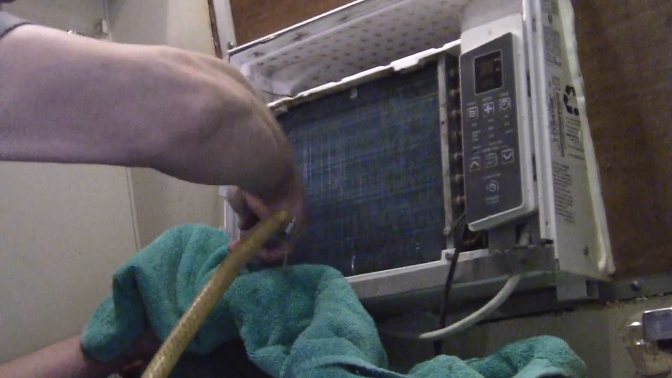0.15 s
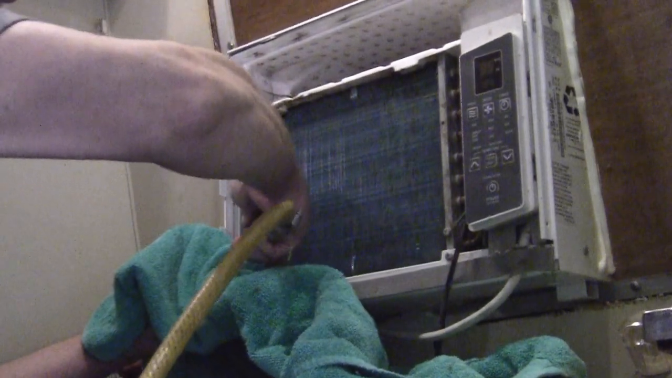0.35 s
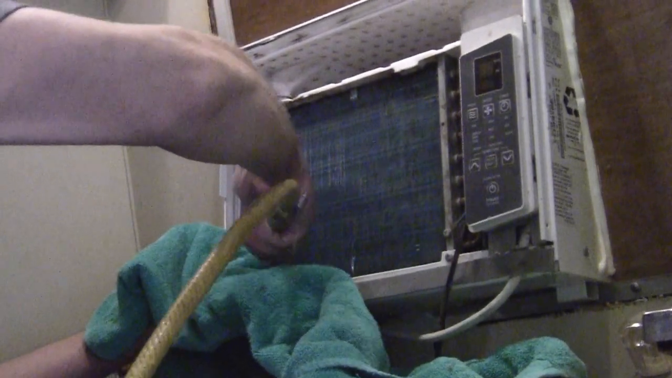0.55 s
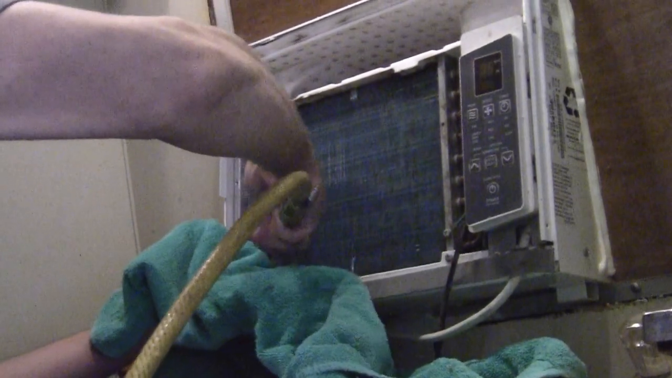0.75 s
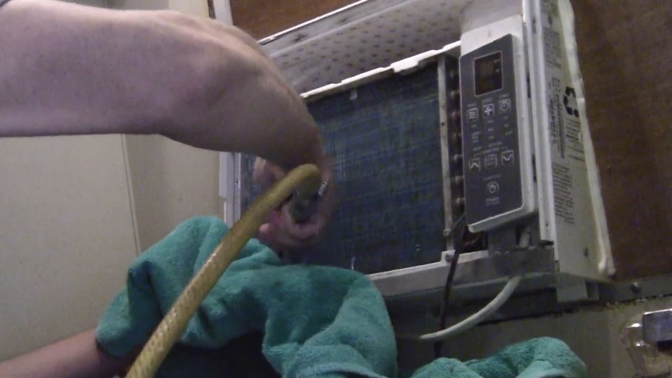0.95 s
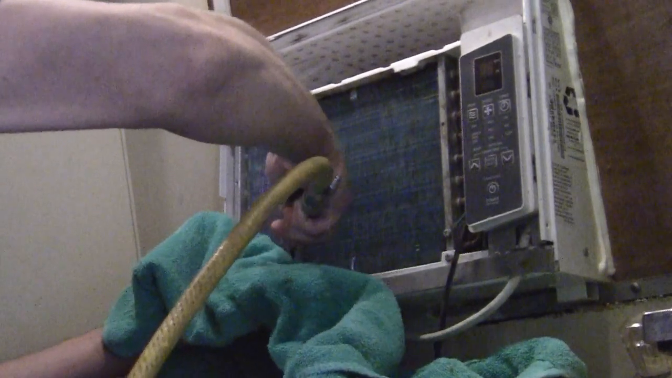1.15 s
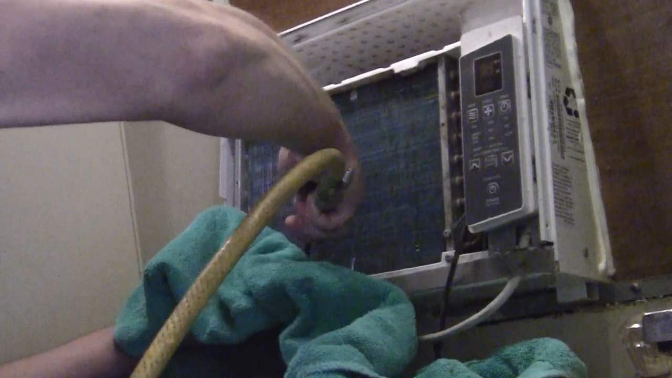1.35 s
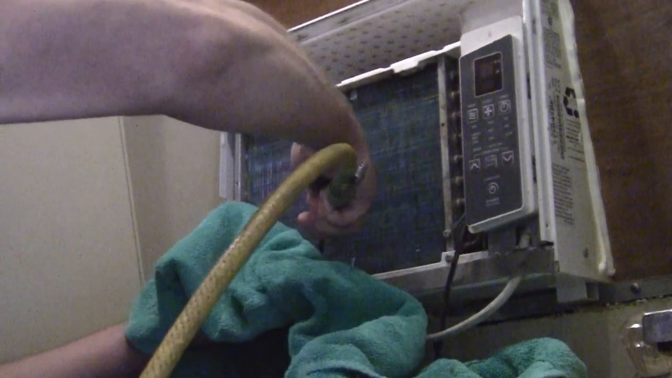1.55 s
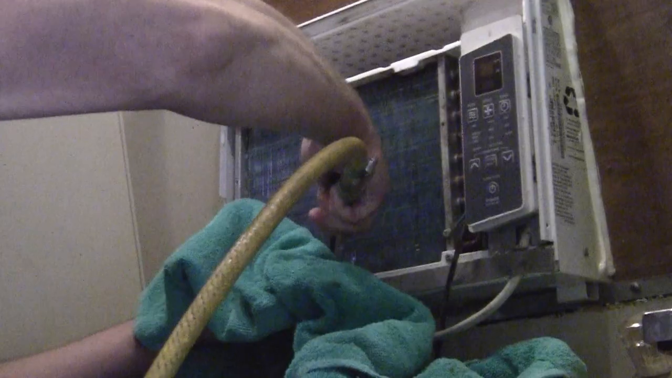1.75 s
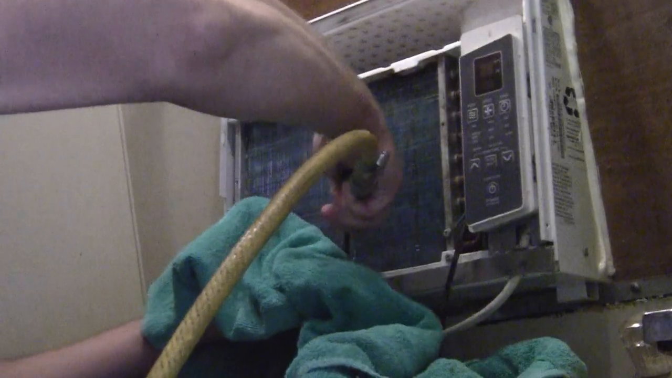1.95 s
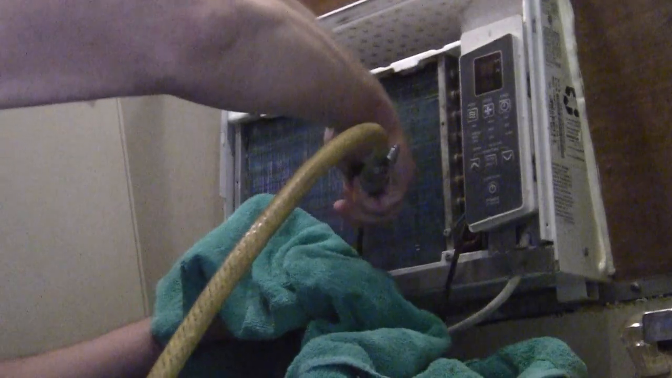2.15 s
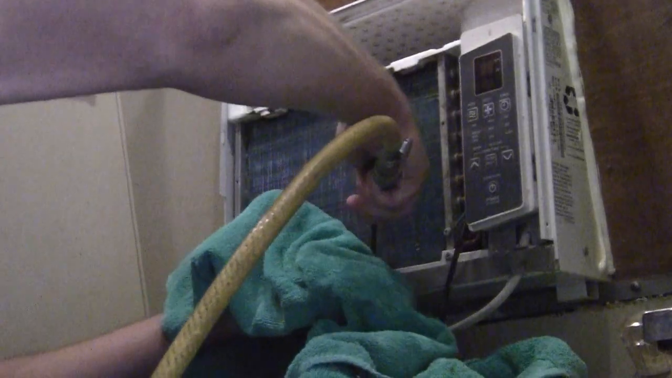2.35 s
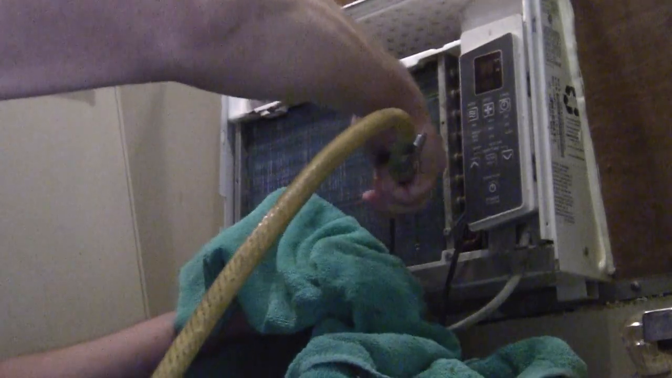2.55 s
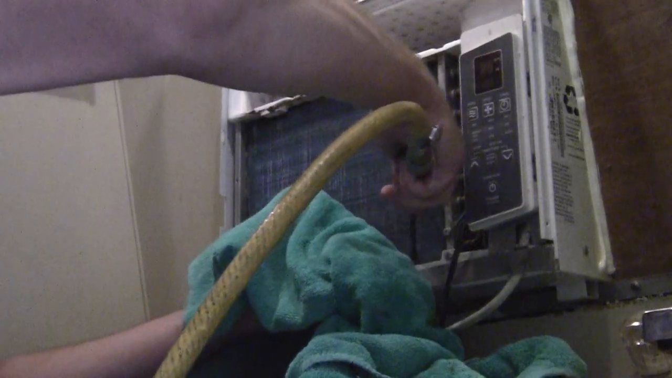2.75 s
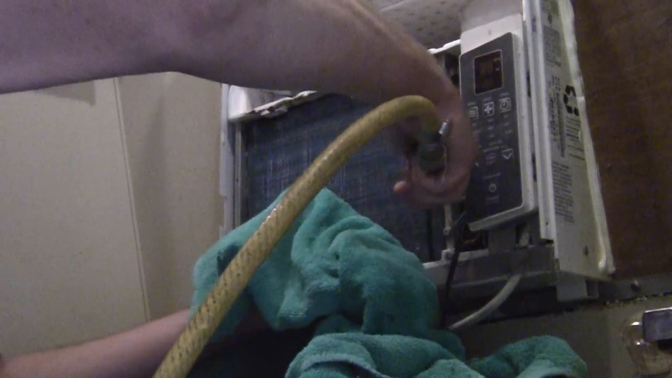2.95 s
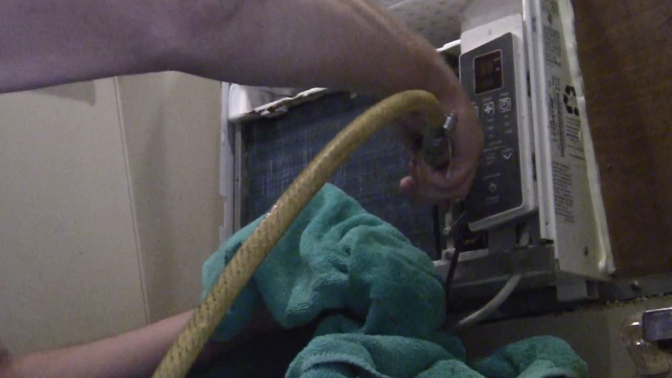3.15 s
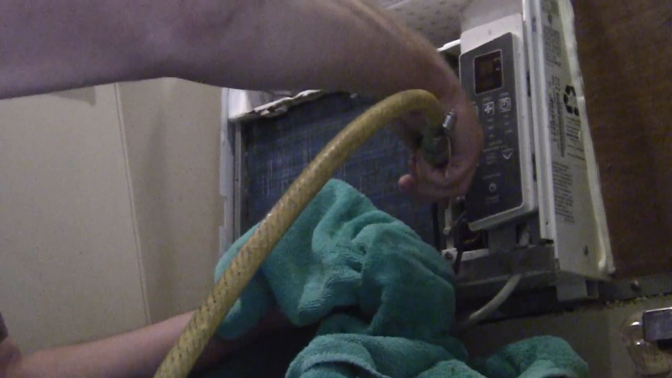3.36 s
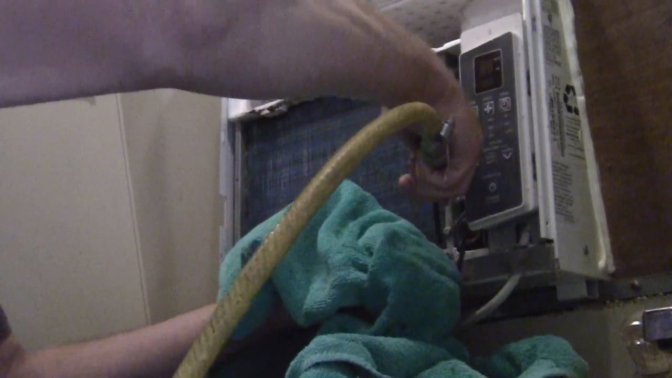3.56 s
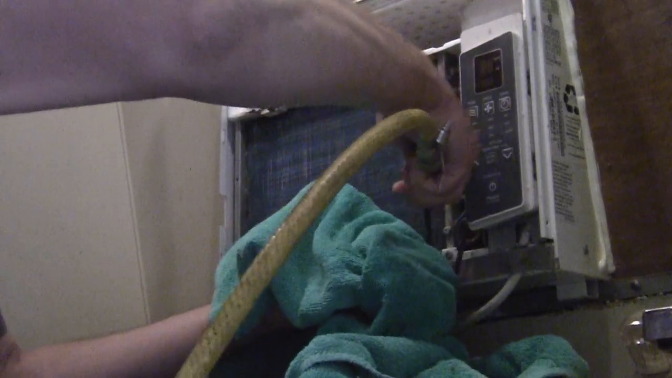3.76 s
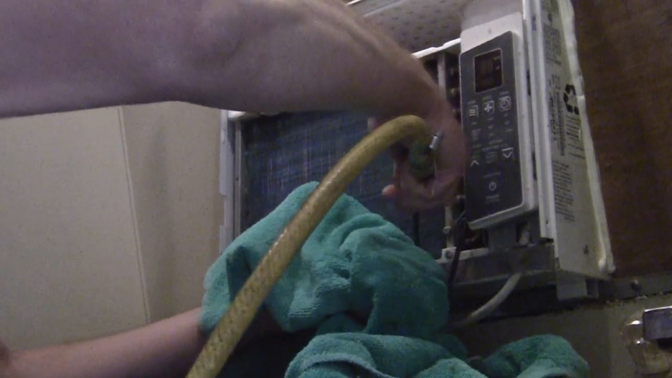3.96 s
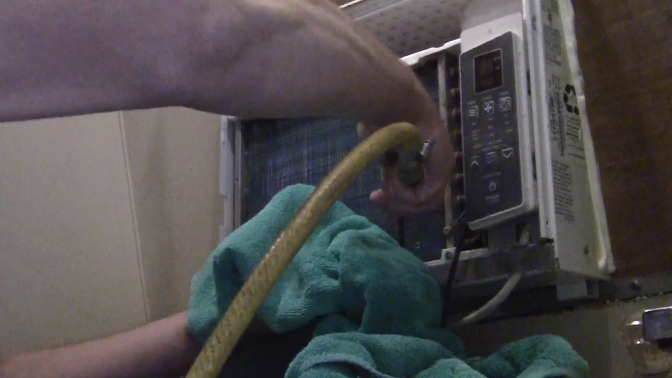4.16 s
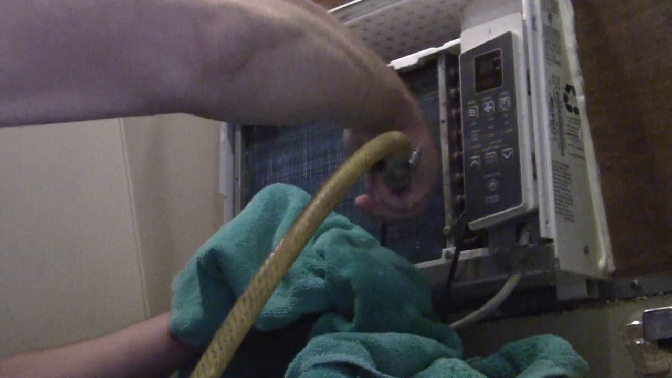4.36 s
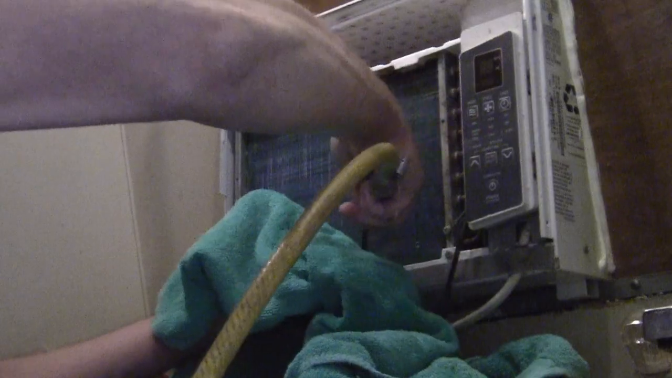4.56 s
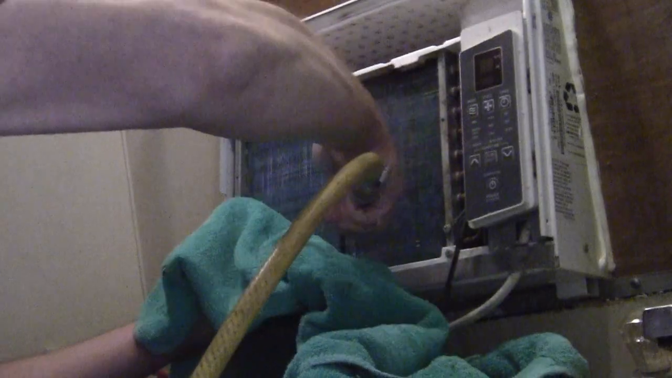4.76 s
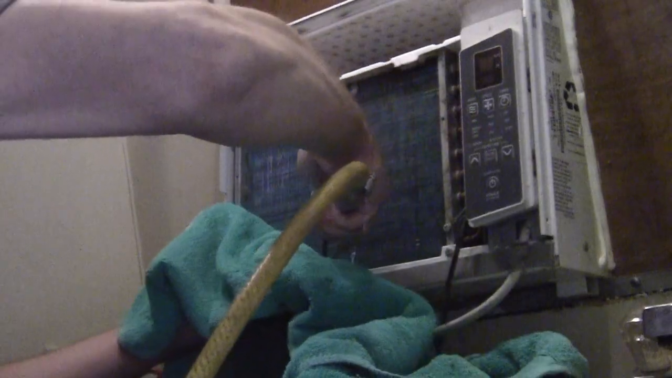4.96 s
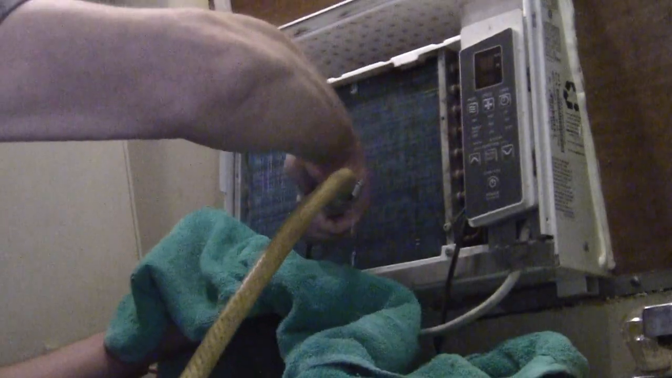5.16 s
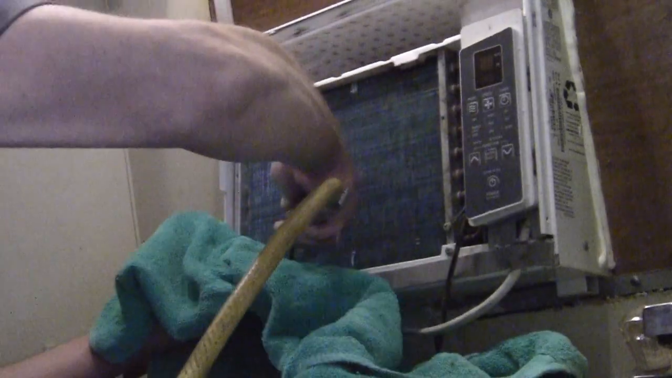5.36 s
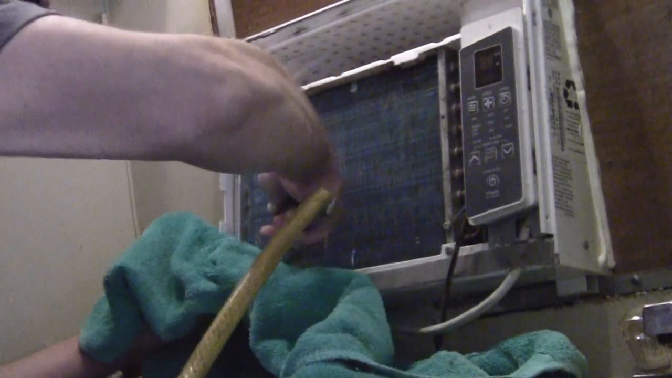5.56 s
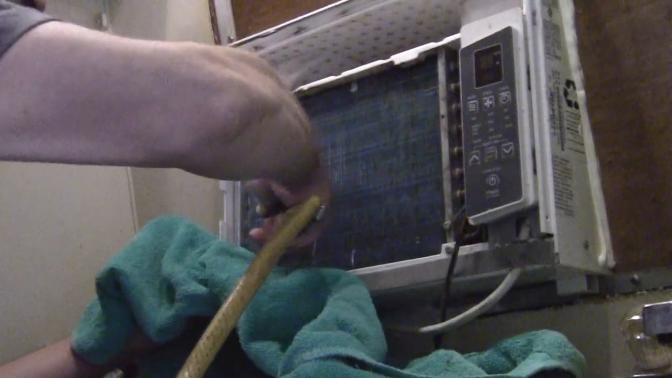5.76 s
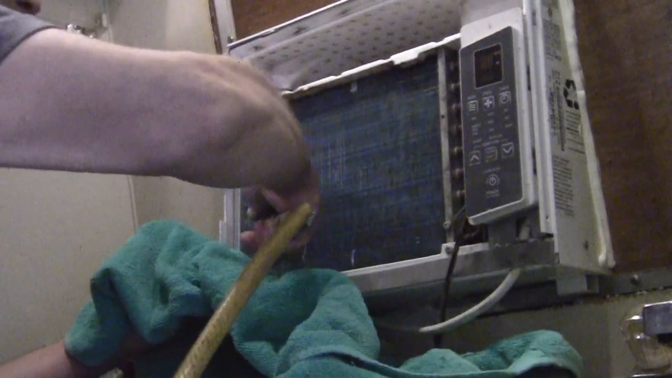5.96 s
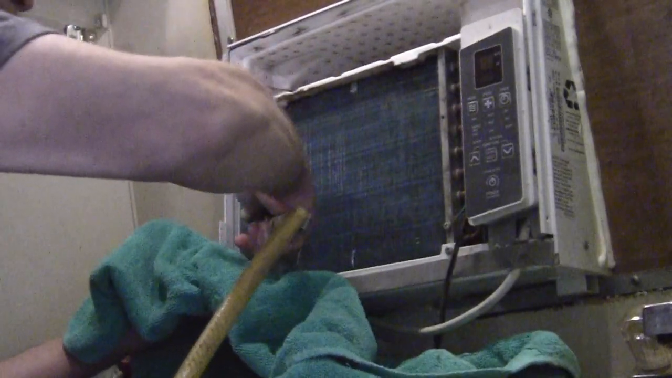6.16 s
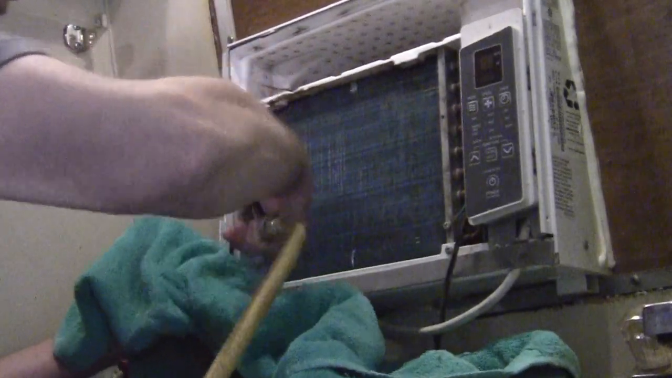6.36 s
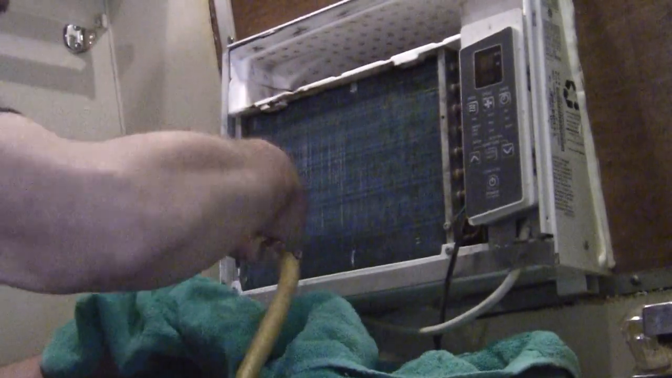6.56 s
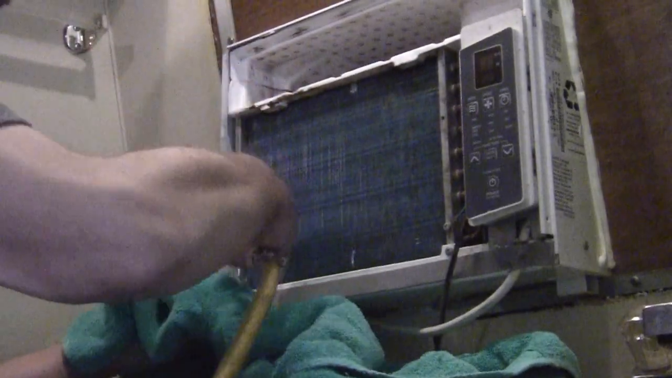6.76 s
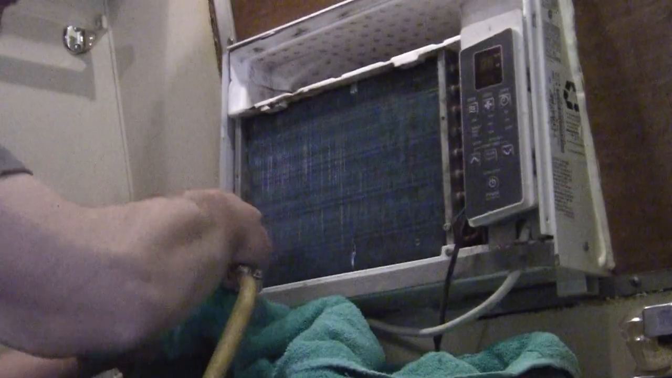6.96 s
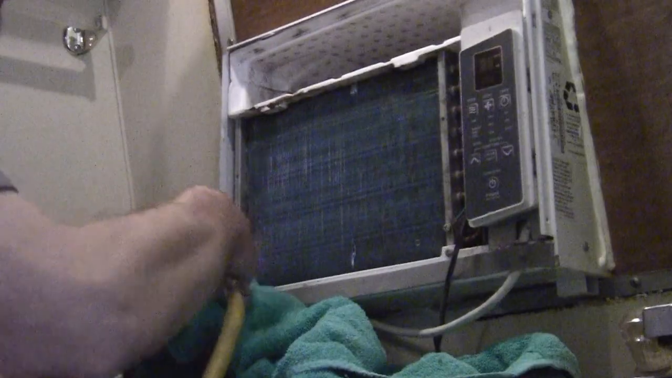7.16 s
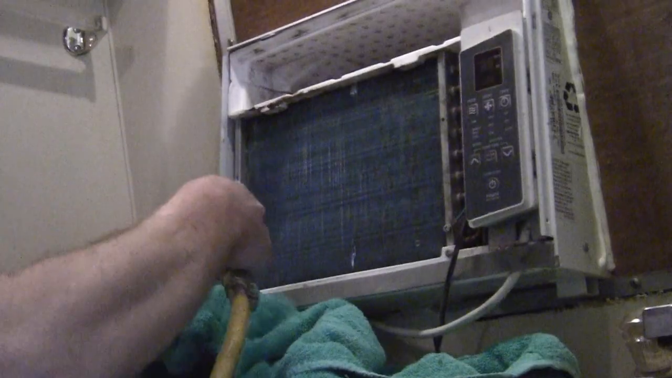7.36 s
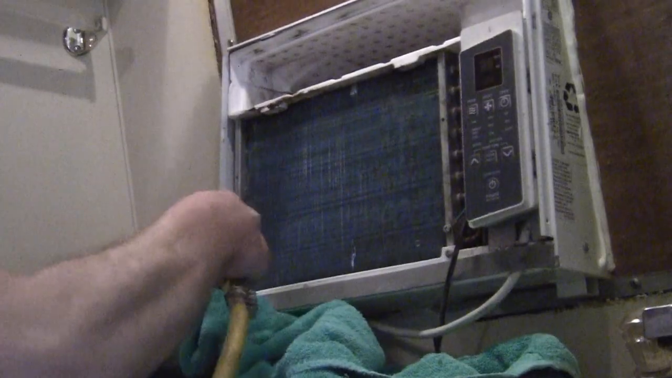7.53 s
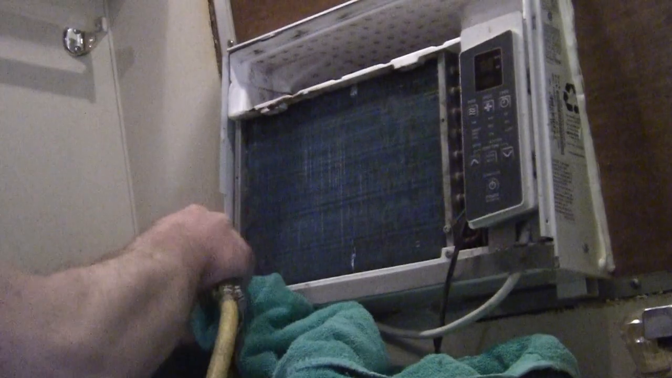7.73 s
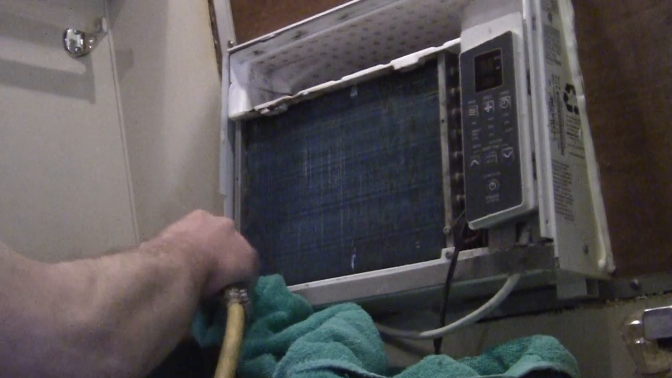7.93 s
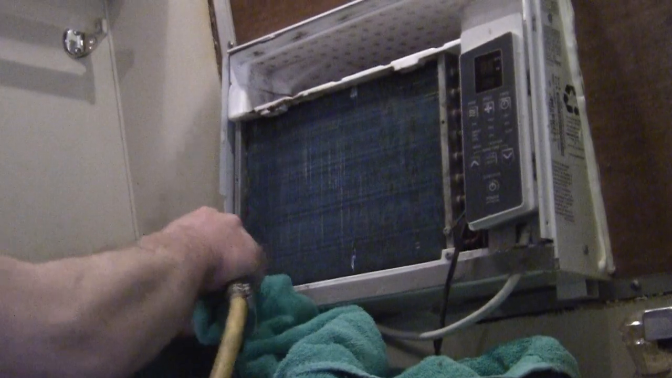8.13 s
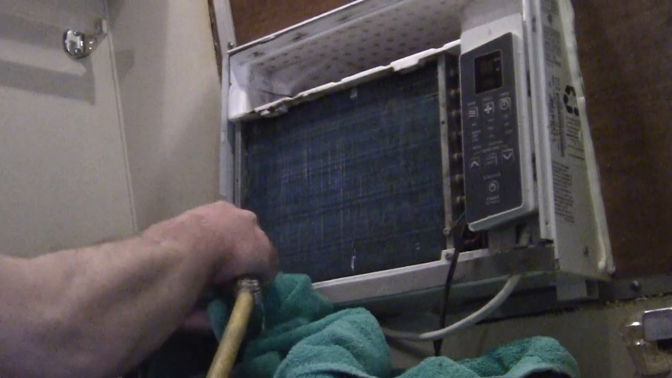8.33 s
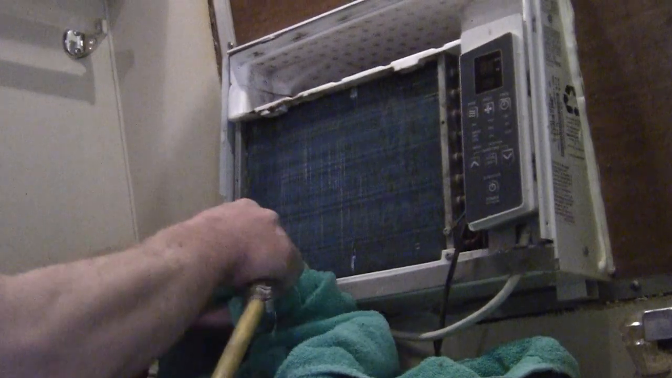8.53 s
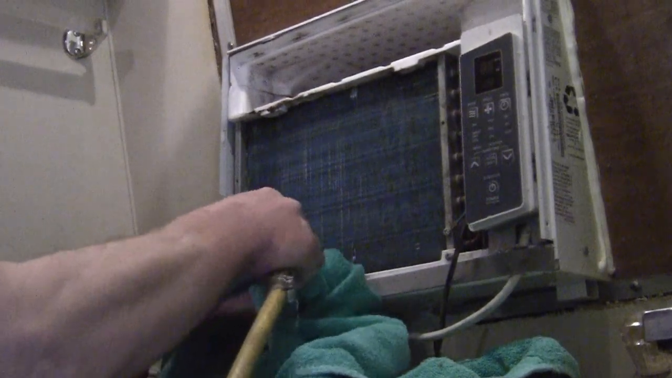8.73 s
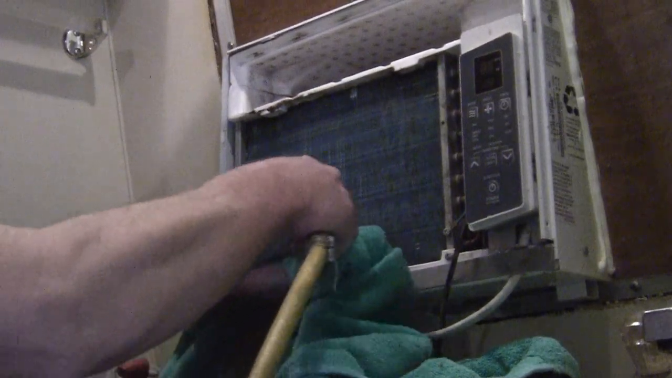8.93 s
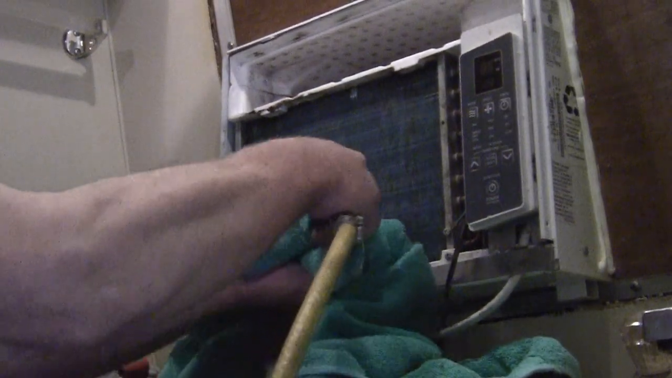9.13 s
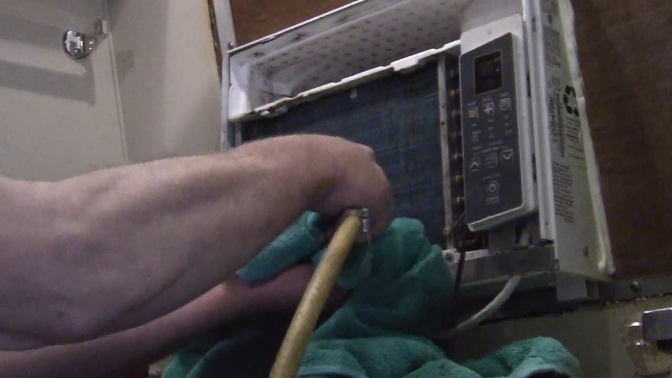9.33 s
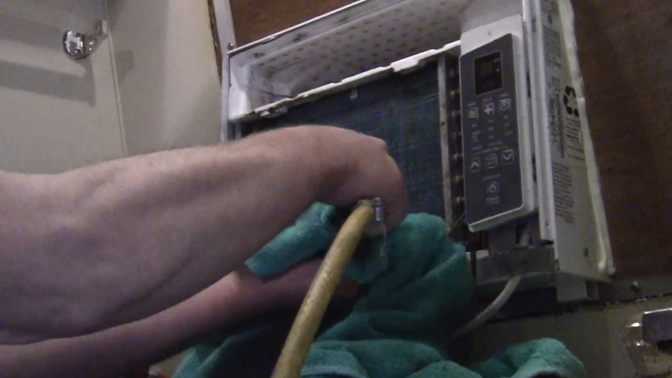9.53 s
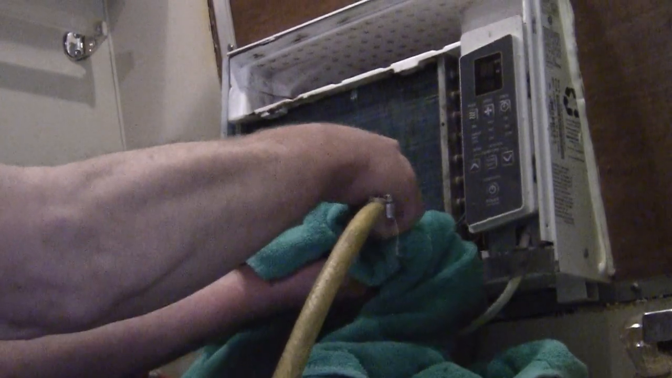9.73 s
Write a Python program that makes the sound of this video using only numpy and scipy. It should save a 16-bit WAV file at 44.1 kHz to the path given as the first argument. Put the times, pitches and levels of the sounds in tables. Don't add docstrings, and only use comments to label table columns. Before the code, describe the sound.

From the start, a loud, bright hiss of compressed air is already running, close and slightly right, in a small hard tub space with short dull echoes. It sweeps over wet metal fins, flickering in tone, with hollow case resonance and brief noisy whistles, notably a cluster of stuttering ones near 4 seconds and lower ones around 6. At about 6.5 the air stops abruptly, leaving a quick faint bleed; a dull hose knock with a short rattle lands at 6.6. A puff bursts from 7.05 to 7.25, with a smaller knock at its start. Quiet returns, exposing low motor hum, ventilation rumble and a faint distant vehicle engine. At 7.75 the jet surges back with a boomy onset and whistles, dips briefly around 8.1 and 8.3, and hisses on, with thin high streaks near 9.5, until the end at 10.

```python
import sys
import numpy as np
from scipy import signal
from scipy.fft import rfft, irfft, next_fast_len
from scipy.io import wavfile
from scipy.ndimage import uniform_filter1d

SR = 44100
rng = np.random.default_rng(int(sys.argv[2]) if len(sys.argv) > 2 else 0)


def waveform_to_disk(signal):
    frames = np.transpose(np.atleast_2d(signal))
    scaled = np.clip(frames, -1, 1) * 32767
    samples = np.round(scaled).astype(np.int16)
    wavfile.write(sys.argv[1], SR, samples)


def level_to_linear(level):
    exponent = np.asarray(level, float) / 20
    return 10 ** exponent


N = 431738
TIME = np.arange(N) / SR
HZ = np.maximum(np.fft.rfftfreq(next_fast_len(N), 1 / SR), 1)


def unit(x):
    return x / np.sqrt(np.mean(x ** 2))


def shape(table):
    hz, db = np.transpose(table)
    return level_to_linear(np.interp(np.log(HZ), np.log(hz), db, -120, -120))


def white():
    return rfft(rng.standard_normal(next_fast_len(N)))


def back(spectrum):
    return irfft(spectrum, next_fast_len(N))[:N]


def peak(hz, width_hz):
    return 1 / (1 + 1j * (HZ ** 2 - hz ** 2) / (HZ * width_hz))


def walk(rate_hz):
    k = int(SR / rate_hz)
    steps = np.repeat(rng.standard_normal(N // k + 1), k)
    return 1.353 * uniform_filter1d(uniform_filter1d(steps, k), k)[:N]


def played(tables, silent_db):
    rows = []
    for table in tables:
        if rows and table[0][0] - rows[-1][0] > .1:
            rows += [[rows[-1][0] + 0.024, *silent_db], [table[0][0] - .006, *silent_db]]
        rows += table
    s, *columns = np.transpose(rows)
    return [np.interp(TIME, s, c, silent, silent) for c, silent in zip(columns, silent_db)]


def spot(s, half_s, hz, width_hz):
    near = slice(max(int((s - half_s) * SR), 0), min(int((s + half_s) * SR), N))
    swell = np.clip(1 - ((TIME[near] - s) / half_s) ** 2, 0, 1)
    return near, swell, signal.iirpeak(hz, hz / width_hz, SR)


def floor():
    # (frequency [Hz], density [dB per Hz])
    floor_mid = [(20, -50), (32, -27.5), (50, -16), (75, -20.5), (140, -10), (190, -17.5), (250, -21.5),
                 (320, -13.5), (460, -23), (900, -23), (1600, -32), (2100, -37.5), (3400, -44.5),
                 (9500, -52.5), (12500, -63), (15500, -68.5)]
    floor_side = [(18, -34), (30, -5), (102, -17), (216, -14.5), (448, -8.5), (1170, -12), (1690, -6.5),
                  (1870, -14), (2990, -17.5), (3230, -21.5), (15500, -34)]
    floor_db, fan_hz, fan_width_hz, fan_db = -43.5, 3050, 130, -72.5
    whine = level_to_linear(fan_db) * unit(back(white() * peak(fan_hz, fan_width_hz) ** 2))
    mid = level_to_linear(floor_db - 5.5) * unit(back(white() * shape(floor_mid))) + whine
    side = level_to_linear(floor_db - 22.5) * unit(back(white() * shape(floor_side)))
    return mid, side


def hum():
    # (frequency [Hz], level [dB], waver [dB])
    hum_lines = [(60.2, -62.5, 0), (117.1, -52.5, 1.8), (172, -64.5, 5.5)]
    out = 0
    for hz, db, waver_db in hum_lines:
        gain = level_to_linear(db + waver_db * walk(9)) * np.sqrt(2)
        out = out + gain * np.sin(2 * np.pi * hz * TIME + 0.41 * walk(5.6))
    return out


def engine():
    # (time [s], firing rate [Hz], load [dB])
    drive_bys = [
        [(2.3, 72.2, -74), (2.61, 72.56, -65), (2.85, 78.4, -52), (3.3, 86, -61), (3.55, 86.6, -78),
         (3.97, 86.2, -64), (4.19, 78.7, -57), (4.53, 71.5, -57), (4.75, 65, -74)],
        [(6.4, 64.4, -59), (6.6, 66.1, -49), (7.24, 67.7, -65), (7.4, 73, -51), (7.95, 76, -58.5),
         (8.1, 77.5, -51), (8.22, 78.2, -54), (8.46, 78.4, -47.5), (8.6, 78.3, -56), (8.78, 78.7, -48),
         (8.9, 78.6, -53), (9.23, 71.2, -64), (9.6, 60.8, -63)],
    ]
    wall_hz, wall_width_hz, wall_db = 157, 18, 10.5
    hz, load_db = played(drive_bys, [72, -80])
    phase = 2 * np.pi * np.cumsum(hz * (1 + 0.005 * walk(17))) / SR
    wall = 1 + level_to_linear(wall_db) / (1 + ((2 * hz - wall_hz) / wall_width_hz) ** 2)
    first = level_to_linear(load_db - 2.0 + 2.5 * walk(7.4)) * np.sin(phase)
    second = wall * level_to_linear(load_db - 7.5 + 2.0 * walk(7)) * np.sin(2 * phase)
    return np.sqrt(2) * (first + second)


def knocks():
    # (time [s], peak [dB], crack re ring [dB])
    bump_table = [
        (6.605, -23, -8.5),
        (6.619, -26.5, -30),
        (7.073, -27, -20),
    ]
    # (frequency [Hz], level [dB], t60 [s])
    tub_modes = [(140, -15, .15), (329, 4.5, 0.14), (364, -1.5, 0.11), (702, -1.5, 0.053), (875, -9.5, .09),
                 (1220, -20, 0.04), (1530, -21, .04)]
    crack_top_hz, body_lag_s = 3300, .008
    out, t = np.zeros(N), np.arange(SR // 3) / SR
    crack_band = signal.butter(3, [crack_top_hz / 6, crack_top_hz], "band", fs=SR)
    for s, db, crack_db in bump_table:
        rattle = rng.standard_normal(len(t)) * level_to_linear(-60 * t / 0.034)
        modes = sum(level_to_linear(g - 60 * t / t60) * np.sin(2 * np.pi * hz * t) for hz, g, t60 in tub_modes)
        ring = np.pad(signal.fftconvolve(rattle, modes), (int(body_lag_s * SR), 0))[:len(t)]
        crack = signal.lfilter(*crack_band, rng.standard_normal(len(t))) * level_to_linear(crack_db - 60 * t / 0.09)
        start = int(s * SR)
        out[start:start + len(t)] += level_to_linear(db - 5.5) * (ring / np.abs(ring).max() + crack)
    return out


def trigger():
    # (open [s], let go [s], hiss [dB], opening surge into the case [dB], surge fade [s])
    pull_table = [
        (-.1, 6.468, -22.5, 0, 0.11),
        (7.039, 7.262, -23, 5, 0.051),
        (7.744, 10, -23, 10, 0.11),
    ]
    open_s, release_db_per_s, hose_db, hose_db_per_s = 0.02, 465, -47.5, 30
    gain, surge_db = 1e-6, 0
    for opens, shuts, db, kick_db, fade_s in pull_table:
        since = np.maximum(TIME - shuts, 0)
        fall = level_to_linear(-release_db_per_s * since) + level_to_linear(hose_db - hose_db_per_s * since)
        gain = gain + level_to_linear(db) * np.clip((TIME - opens) / open_s, 0, 1) ** 2 * fall
        decay = np.exp(-(np.maximum(TIME - opens, 0) / fade_s) ** 2)
        surge_db = surge_db + kick_db * (TIME > opens) * decay
    return gain, surge_db


def ribs():
    # (time [s], half length [s], flare [dB], change of the whole jet [dB])
    rib_table = [(0.493, 0.057, 2.5, -1.5), (0.772, .05, 5, -0.5), (1.007, 0.152, 2, 0),
                 (1.634, 0.11, 6.5, 0), (2.555, 0.18, 3.5, 0.5), (2.823, 0.12, 6.5, 0),
                 (3.407, 0.17, -0.5, 0), (4.512, 0.086, 7, 0.5), (4.769, 0.0157, 4.5, -4.5),
                 (5.398, 0.1, 2, 1), (6.338, .08, 0, -0.5), (7.14, 0.066, -7.5, -2), (7.886, 0.13, 9, -1),
                 (8.089, 0.029, 6, -6.5), (8.328, 0.044, 1.5, -3), (8.626, 0.16, 2.5, 1),
                 (9.02, 0.11, 3.5, 0.5), (9.425, 0.032, -3, -3)]
    bumps = [np.clip(1 - np.abs(TIME - s) / half_s, 0, 1) for s, half_s, _, _ in rib_table]
    return np.array(rib_table)[:, 2:].T @ np.array(bumps)


def tub(x):
    # (delay [ms], drift [ms], level [dB])
    echo_table = [(2.3, .1, -15), (4.1, .12, -14), (6.7, .15, -14), (11.3, .2, -14), (15.9, .1, -14),
                  (21.7, .1, -15), (29.3, .1, -16)]
    dull = uniform_filter1d(x, size=2)
    out = x
    for ms, drift_ms, db in echo_table:
        out = out + level_to_linear(db) * np.interp(TIME - (ms + drift_ms * walk(2)) / 1000, TIME, dull)
    return out


def jet():
    layer_hz = [400, 1150, 3200, 8000, 14000]
    # (frequency [Hz], density [dB per Hz])
    jet_mid = [(120, -51.5), (200, -28), (365, -22), (585, -20), (702, -9), (783, -15), (992, -11.5),
               (1380, -8), (1760, -5), (2650, -4), (5010, -2), (8500, 2.5), (10200, 2), (11400, -4.5),
               (12500, -12.5), (13600, -19.5), (14400, -27), (15700, -35.5)]
    jet_side = [(120, -57), (200, -44.5), (399, -38.5), (544, -29.5), (1150, -11), (1560, -15),
                (1740, -10.5), (2470, -8), (2900, -4.5), (3240, -5.5), (8500, -0.5), (11600, 3),
                (13900, -10), (15500, -37)]
    # (frequency [Hz], width [Hz], gain [dB])
    case_modes = [(366.4, 44, 9), (677, 45, -4), (820, 23, -8), (860, 23, 3), (1010, 81, 2),
                  (1090, 36, -6.5), (1405, 130, -5), (1930, 85, -11), (2280, 34, -11), (3750, 97, -11)]
    # (time [s], top-layer lift [dB])
    aim = [(0, 1.5), (1.9, -1), (2.44, 2), (2.6, -0.5), (2.9, 1.5), (3.3, -1.5), (4.75, 1.5), (5.5, -1),
           (6.2, -1.5), (6.45, 1), (7.14, 6.5), (7.9, 0), (8.2, 7), (8.6, 4.5), (8.95, 7), (9.2, 4.5),
           (9.47, 7), (9.79, 5)]
    # (time [s], nearness [dB])
    nearness = [(0, 3.5), (.78, 5.5), (.9, 3.5), (1.7, 2), (2.4, -2.5), (3.0, -5), (3.6, -0.5), (4.2, -3),
                (5.0, -0.5), (5.3, 3.5), (5.7, 4), (6.05, 10), (6.45, 8), (7.25, 10), (7.9, 7), (8.0, 4.5),
                (8.3, 0), (8.8, -0.5), (9.4, -2)]
    # (to nearness [dB/dB], to surge [dB/dB], to flare [dB/dB])
    follow = [(0.38, 1.47, 0.59), (0.82, 0.67, 0.64), (0.28, 0.24, 0.3), (-0.0045, -0.2, -0.19),
              (-0.27, 0.41, -0.43)]

    flow, surge_db = trigger()
    flare_db, drop_db = ribs()
    shifts = np.array(follow) @ np.array([np.interp(TIME, *np.transpose(nearness)), surge_db, flare_db])
    shifts += [spread_db * walk(25) for spread_db in (2.5, 1.1, 0.63, 0.75, 0.53)]
    shifts[4] += np.interp(TIME, *np.transpose(aim))

    case = 1 + sum(level_to_linear(db) * peak(hz, width_hz) for hz, width_hz, db in case_modes)
    echoed = rfft(tub(rng.standard_normal(N)), next_fast_len(N))
    mid_noise = echoed * shape(jet_mid) * np.abs(case)
    quarter_shifted = level_to_linear(-7.5) * peak(12800, 3000) * peak(12800, -3000)
    quarter_shifted = quarter_shifted + level_to_linear(-16.5) * np.abs(peak(9000, 7000)) + level_to_linear(-34) * peak(900, 2500)
    side_noise = white() * shape(jet_side) * level_to_linear(-10.0) + 1j * quarter_shifted * mid_noise
    scale = np.std(back(mid_noise * (HZ > 5000) * (HZ < 12000)))

    mid, side = 0, 0
    for band in range(13):
        window = np.clip(1 - np.abs(2 * np.log2(HZ / 220) - band), 0, 1)
        place = np.interp(np.log(220 * 2 ** (band / 2)), np.log(layer_hz), range(5))
        low = min(int(place), 3)
        db = drop_db + (low + 1 - place) * shifts[low] + (place - low) * shifts[low + 1]
        gain = flow * level_to_linear(db + 0.6 * walk(3.414) + 0.3 * walk(12)) / scale
        mid = mid + gain * back(mid_noise * window)
        side = side + gain * back(side_noise * window)
    return mid, side


def moving_bands(air):
    # (time [s], half length [s], frequency [Hz],
    # width [Hz], gain [dB])
    passing_bands = [(0.323, 0.73, 2200, 130, 1.5), (.6, 0.38, 970, 200, 4), (.5, 0.25, 2950, 350, -8),
                     (.6, 0.63, 1790, 150, -11), (1.197, 0.38, 1210, 120, -7), (1.25, 0.83, 3870, 500, 2.5),
                     (1.5, .35, 2570, 180, 5.5), (1.6, 0.21, 3130, 150, 5), (1.7, 0.57, 1505, 200, 3),
                     (2.303, 0.47, 1005, 400, -5), (3.6, 1.24, 1287, 80, 9), (3.7, 1, 1800, 150, -2),
                     (3.4, 0.4, 4550, 200, 4), (3.3, 0.64, 3060, 200, 5), (3.3, 0.37, 2290, 600, -2.5),
                     (4.91, 0.11, 2800, 400, -4), (5.15, 0.099, 1530, 120, -1), (5.6, 0.34, 3120, 120, 4),
                     (6.3, 0.24, 1960, 100, 2), (6.2, 0.37, 1720, 200, -9), (7.17, .15, 980, 100, -2.5),
                     (8.357, 0.2, 3220, 1200, -2), (8.5, 0.5, 1050, 90, 4.5), (8.9, 0.31, 2050, 700, 3),
                     (9.0, 0.15, 4000, 700, 2.5), (9.29, 0.19, 3030, 900, -3.5), (9.58, 0.25, 5300, 200, 1),
                     (.35, 0.17, 7100, 1200, 3.5), (.6, 0.26, 5300, 600, -3), (.5, .4, 9400, 600, -6),
                     (2.1, .35, 9400, 900, 1.5), (2.5, .4, 6600, 500, 3.5), (3.085, 0.497, 8150, 900, 3),
                     (3.45, 0.18, 10400, 700, 2.5), (4.2, 0.5, 7900, 1000, 2.5), (5.6, 0.38, 6000, 500, 1),
                     (6.1, .4, 10100, 600, 0.5), (9, 0.97, 9900, 1800, -1), (8.8, 0.59, 6640, 3000, -1.5),
                     (9.6, 0.29, 8000, 2500, -1),
                     (.25, 0.41, 704, 120, 1.5), (0.995, .15, 600, 400, -2.5), (1.9, 0.78, 600, 400, -1.5),
                       (2.0, 0.13, 1930, 350, 3.5), (2.44, 0.46, 2870, 900, 2.5), (2.95, 0.27, 420, 400, 4.5),
                       (3.7, 0.47, 445, 400, -1.5), (4.7, 0.75, 1010, 110, -4.5), (5.366, 0.028, 2100, 800, 3),
                       (5.6, 0.65, 5060, 700, -2.5), (7.17, .14, 1600, 250, -7), (7.253, .08, 700, 300, 5.5),
                       (7.846, 0.11, 1900, 700, -3), (7.905, 0.094, 4580, 2200, 2.5),
                       (8.36, 0.22, 520, 420, -11), (8.03, .05, 480, 350, -8), (.55, .1, 2500, 2500, -1.5),
                       (3.1, 0.11, 2000, 600, 2), (5.12, .14, 8500, 3000, -2), (9.398, 0.11, 1830, 1200, 2.5)]
    out = air.copy()
    for s, half_s, hz, width_hz, db in passing_bands:
        near, swell, ring = spot(s, half_s, hz, width_hz)
        out[:, near] += (level_to_linear(db * np.sqrt(swell)) - 1) * signal.filtfilt(*ring, air[:, near])
    return out


def whistles():
    # (time [s], half length [s], frequency [Hz],
    # width [Hz], level [dB])
    edge_tones = [(1.9, 0.26, 2820, 140, -39), (2.5, 0.2, 3650, 90, -38.5), (2.75, .04, 5280, 90, -36),
                  (2.888, .05, 2260, 119, -35), (3.7, 0.02, 2780, 90, -34), (3.946, .025, 2730, 90, -35),
                  (3.97, 0.028, 2450, 90, -38), (4.025, 0.027, 2750, 100, -32.5),
                  (4.068, 0.012, 2720, 90, -34), (4.12, 0.032, 2500, 90, -33),
                  (4.155, 0.032, 2770, 90, -32), (4.21, 0.014, 2500, 160, -31),
                  (4.12, 0.045, 5300, 300, -31.5), (4.158, .03, 5600, 150, -35),
                  (5.1, 0.045, 2500, 148, -35), (5.43, .04, 3130, 90, -40), (5.466, .04, 2590, 90, -40),
                  (5.62, 0.06, 2500, 90, -35), (5.79, .09, 2590, 90, -36), (6.1, .11, 2310, 71, -49),
                  (6.113, .12, 1405, 50, -32.5), (6.3, 0.088, 1405, 60, -35.5), (6.0, .08, 2180, 120, -37),
                  (7.073, .03, 690, 60, -34.5), (7.072, 0.017, 1410, 70, -38),
                  (7.075, 0.026, 2170, 120, -38), (8.8, 0.0183, 2500, 90, -38),
                  (7.83, 0.083, 1027, 60, -31), (8.0, 0.049, 1050, 36, -35.5), (7.96, 0.042, 3200, 80, -30),
                  (7.81, 0.026, 3670, 80, -32), (8.826, 0.037, 600, 500, -37.5), (3.32, .33, 4530, 90, -38),
                  (4.05, .17, 2620, 300, -40),
                  (5.12, .04, 1460, 50, -39), (5.164, .04, 1550, 45, -38), (5.2, .03, 1860, 55, -39.5),
                    (5.258, .04, 2590, 150, -41), (5.381, .03, 2100, 70, -39), (5.63, .04, 1425, 50, -39),
                    (5.67, .03, 2620, 50, -33), (5.84, .03, 2330, 60, -39), (6, .04, 2180, 70, -45),
                    (7.77, .02, 720, 80, -30), (7.885, .02, 1010, 60, -34), (7.865, .025, 1400, 70, -35),
                    (8.05, .02, 3800, 80, -35), (9.49, .03, 6820, 60, -35), (9.52, .05, 5300, 70, -33),
                    (9.529, .04, 7470, 70, -32), (9.51, .04, 8000, 60, -32), (9.46, .02, 9090, 60, -34),
                    (9.61, .025, 7500, 70, -34), (9.64, .03, 5200, 70, -38), (9.73, .06, 7700, 70, -35),
                    (9.767, .02, 8550, 60, -35), (9.53, .04, 4250, 90, -36),
                    (8.3, .003, 11000, 4000, -63.5), (7.645, .008, 6000, 5000, -66.5),
                    (.785, .025, 3600, 500, -32), (.79, .02, 2300, 600, -35), (2.82, .07, 1000, 900, -38.5),
                    (6.65, .05, 460, 500, -51.5)]
    out, air = np.zeros(N), rng.standard_normal(N)
    for s, half_s, hz, width_hz, db in edge_tones:
        near, swell, ring = spot(s, half_s, hz, width_hz)
        out[near] += level_to_linear(db) * np.sqrt(swell) * unit(signal.filtfilt(*ring, air[near]))
    return out * level_to_linear(0.98 * walk(60))


def scene():
    mid, side = moving_bands(np.array(jet()))
    mid = mid + whistles()
    side = side - 0.06 * mid
    air, air_side = floor()
    low = hum() + engine()
    mid = mid + air + knocks() + low
    side = side + air_side + level_to_linear(-30.5) * np.gradient(low) * SR / (2 * np.pi * 120)
    return np.array([mid + side, mid - side])


def band_limit(x):
    return signal.sosfilt(signal.butter(12, 15670, fs=SR, output="sos"), x)


def record(dry):
    return band_limit(dry)


dry = scene()
out = record(dry)
waveform_to_disk(out)
```